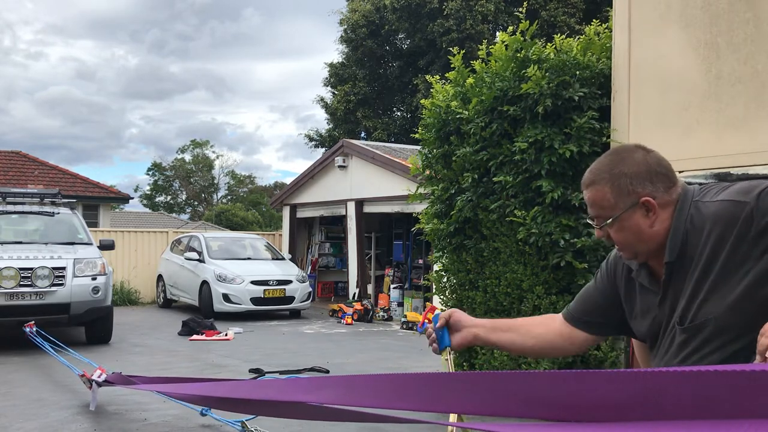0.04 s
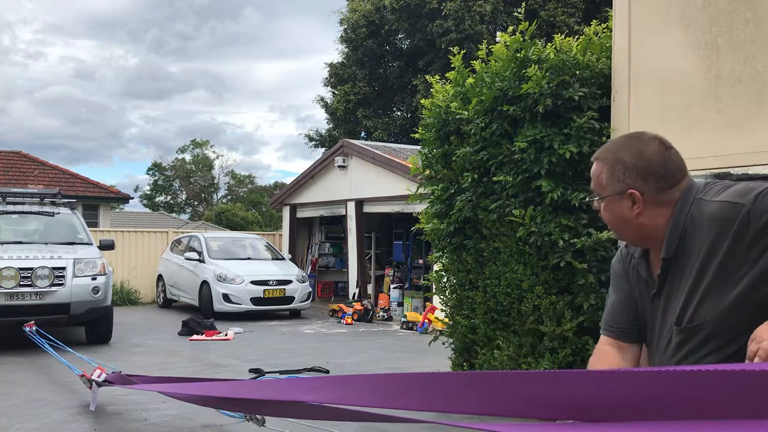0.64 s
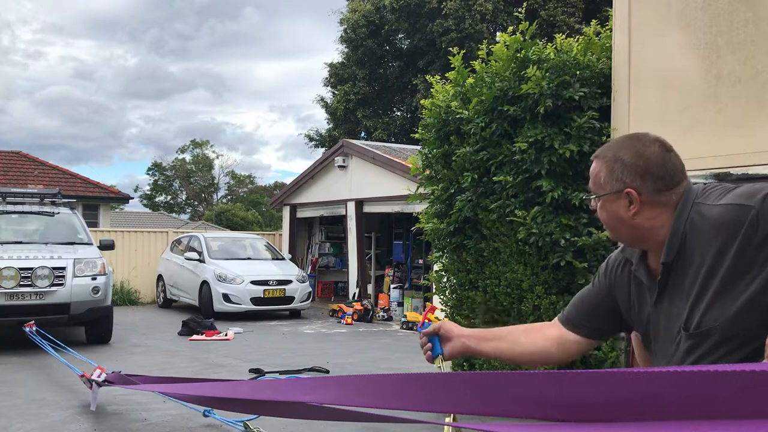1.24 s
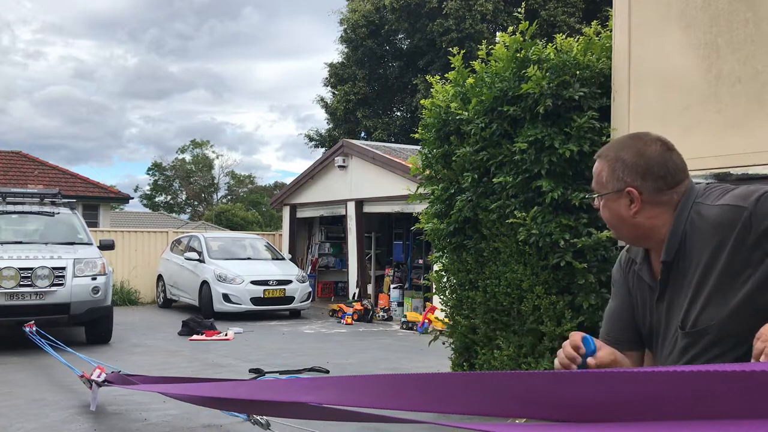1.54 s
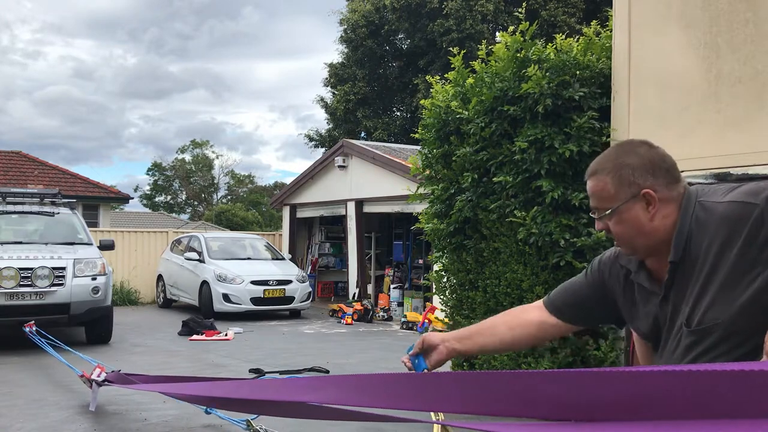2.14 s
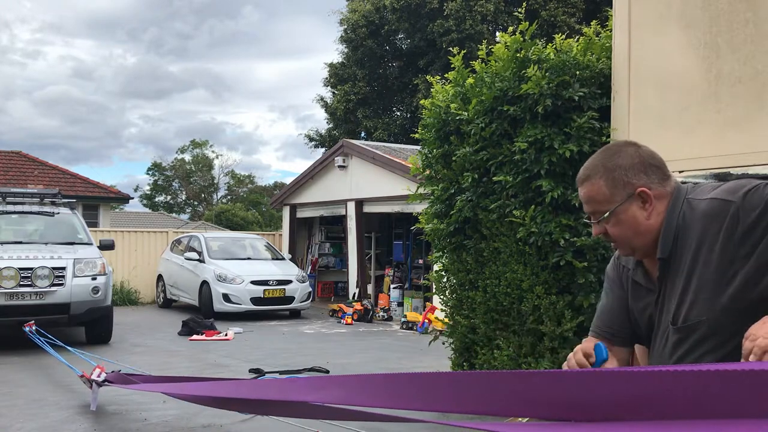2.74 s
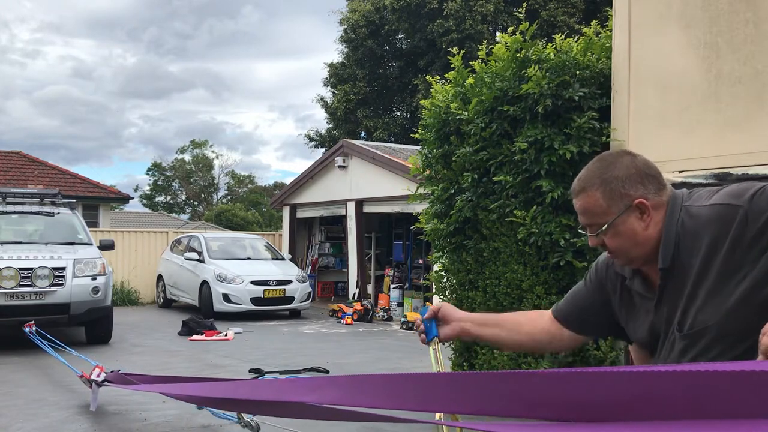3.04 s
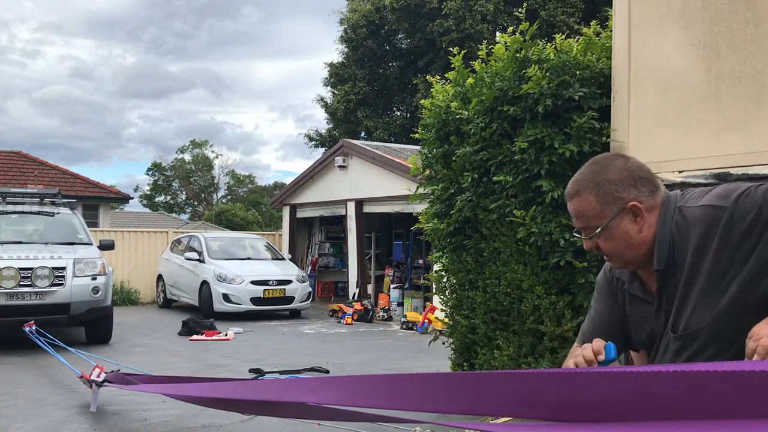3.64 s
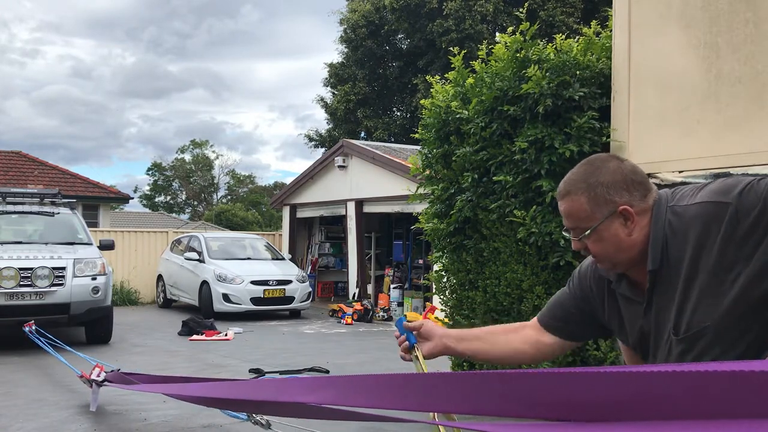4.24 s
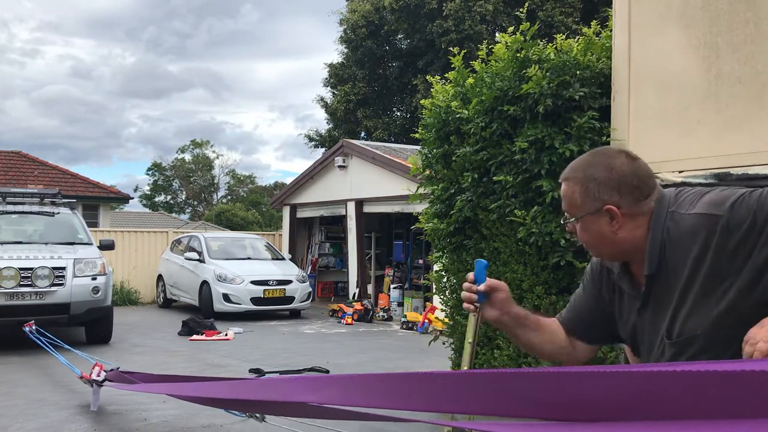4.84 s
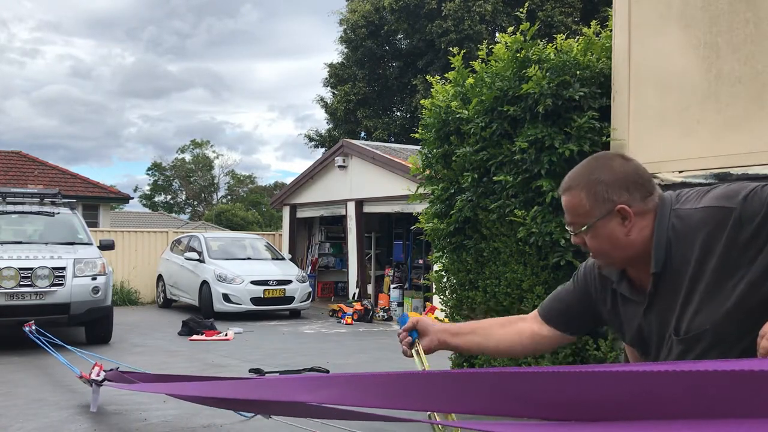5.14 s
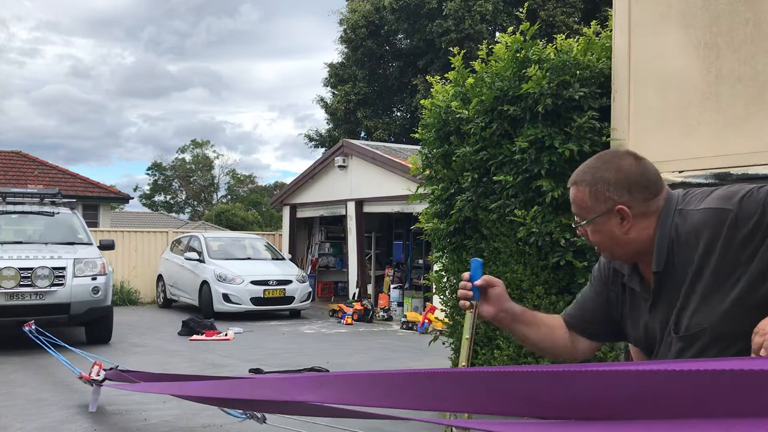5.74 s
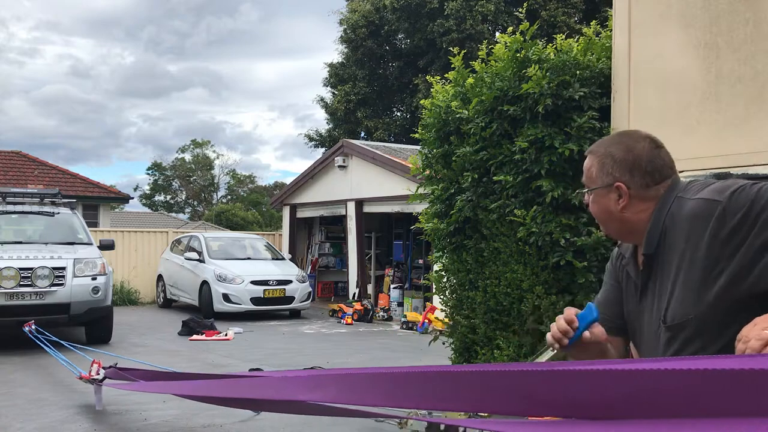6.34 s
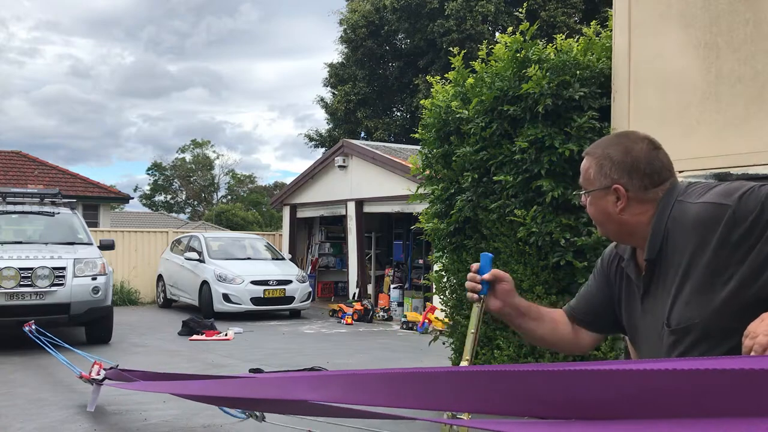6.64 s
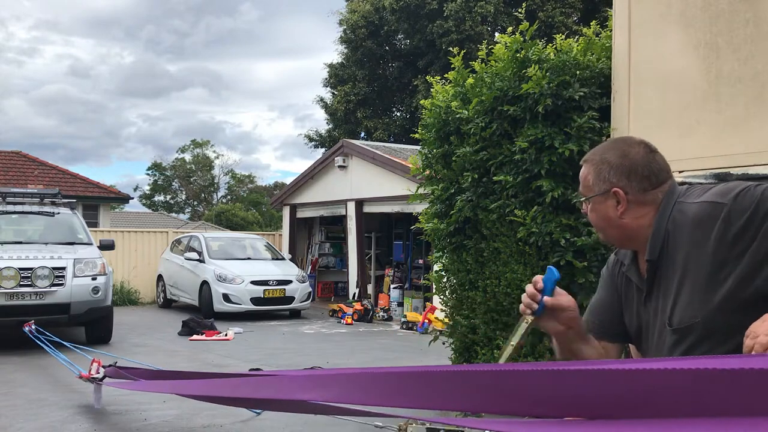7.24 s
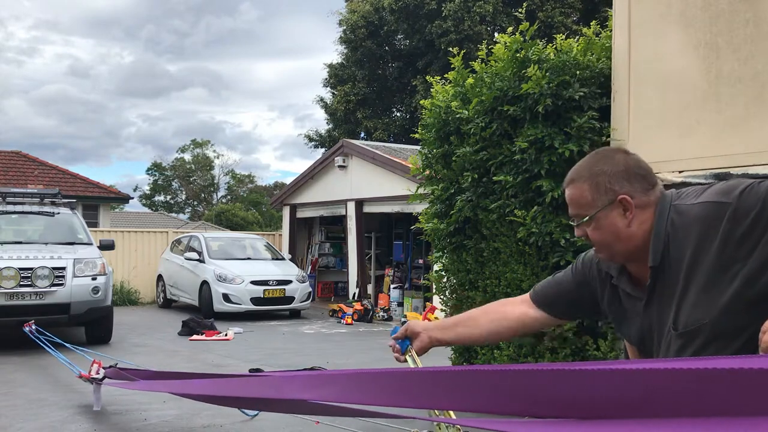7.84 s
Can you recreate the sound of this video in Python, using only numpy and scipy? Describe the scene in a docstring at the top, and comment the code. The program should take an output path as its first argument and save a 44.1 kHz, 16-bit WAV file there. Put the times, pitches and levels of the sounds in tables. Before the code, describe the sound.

A hand winch is pumped nearby in a paved yard, repeating about once a second for eight seconds. Each pull makes a run of three or four soft, rattling metal clicks, followed by a dull clunk as the load settles. The lever's return gives two or three louder, sharper clicks, then a small tick as the ratchet catches again. These sharp groups come at about 0.5, 1.5, 2.5, 3.5, 4.5, 5.4, 6.3 and 7.2 seconds. At roughly 0.9, 1.9 and 3 seconds the tightening strap gives a short, falling twang together with a bright chink of hooks, the first two strongest. After that the ratcheting continues evenly, with a last clunk near 8 seconds. Every click rings briefly in the steel and gets a slight echo from the walls. Underneath lies a faint, low rumble of open air and distant traffic, with a far engine swelling slightly around 5 seconds.

```python
"""A hand winch hauls a vehicle on a taut strap in a paved yard, over the rumble of far traffic.
A pull on the long lever runs the soft, rattling drum pawl; the strap twangs and the hooks chink as they
tighten, and the load settles back on the pawl. The return stroke drops the lever pawl sharply over two
or three teeth, and it bites for the next pull. The pumping goes on, with twangs and chinks only on the
early pulls. Every click rings the steel frame, and the walls answer."""
import sys
import numpy as np
from scipy import signal
from scipy.fft import rfft, irfft, next_fast_len
from scipy.io import wavfile
from scipy.ndimage import map_coordinates

SR = 44100
rng = np.random.default_rng(int(sys.argv[2]) if len(sys.argv) > 2 else 0)


def unload_wav(signal):
    """Save mono or channel-first audio to the path in sys.argv[1] as 16-bit WAV at rate SR, clipped to [-1, 1]."""
    wavfile.write(
        sys.argv[1],
        SR,
        np.round(np.clip(np.atleast_2d(signal).T, -1, 1) * 32767).astype(np.int16),
    )


N = 352359

# Tone colour of each kind of contact:
# (frequency [Hz], lever pawl [dB], drum pawl [dB], settling [dB], bite [dB], chink [dB])
COLOURS = [(250, -27, -15, -18, -25, -23), (560, -26, -15.5, -12, -26, -24), (805, -11.5, -12, -1, 2, -32),
           (1290, -6, -6, 2.5, -4, -19), (2140, -5.5, -4.5, 2, 8, 1), (3150, -1, -1.5, -2, -1.5, -9.5),
           (4630, -1.5, -1.5, -3.5, -3, -3.5), (6350, -1.5, -5, -11, -3.5, -12),
           (6760, -4.5, -7.5, -15, -6.5, 2), (9550, -2.5, -11, -18, -9, -5),
           (12800, 4.5, -12, -20.5, -6, -8), (16200, -3.5, -19, -25, -20, -19)]
LEVER_TONE, DRUM_TONE, SETTLE_TONE, BITE_TONE, CHINK_TONE = range(1, 6)  # its columns


def amp(db):
    """Decibels to gain."""
    return 10 ** (np.asarray(db) / 20)


def unit(x):
    """Scale to rms 1."""
    return x / np.sqrt(np.mean(x ** 2) + 1e-20)


def along(points, hz):
    """Read (frequency [Hz], value) points on a log axis."""
    f, v = np.transpose(points)
    return np.interp(np.log(hz + 1), np.log(f + 1), v)


def filtered(x, response):
    """Shape x with a frequency response."""
    n = x.shape[-1]
    m = next_fast_len(n + 2048)
    return irfft(rfft(x, m) * response(np.fft.rfftfreq(m, 1 / SR)), m)[..., :n]


def resonance(hz, centre_hz, width_hz):
    """Response of one damped mode, 1 at its centre."""
    return 1j * hz * width_hz / (centre_hz ** 2 - hz ** 2 + 1j * hz * width_hz)


def wobble(rate):
    """A smooth random curve, rate knots a second."""
    return map_coordinates(rng.standard_normal(int(N * rate / SR) + 4), [np.arange(N) * rate / SR])


def add(track, s, x):
    """Mix x into the track at time s; what falls outside is dropped."""
    start = round(s * SR)
    x = x[max(-start, 0):]
    part = track[max(start, 0):][:len(x)]
    part += x[:len(part)]


def outdoors(air_db=-54, traffic_db=-61):
    """The bed: gently wavering open-air rumble, the low drone of far traffic and one far engine."""
    air_spectrum = [(24, -57), (33, -20), (42, -1.5), (70, -2), (110, -3), (160, -9.5), (260, -9.5),
                    (400, -16.5), (650, -17), (1050, -16), (2000, -23), (5500, -33), (8000, -36.5),
                    (16000, -46.5)]  # open-air rumble: (frequency [Hz], relative density [dB])
    engine_swell = [(0, -66), (4.5, -65.5), (5, -58), (5.6, -59), (6.4, -64), (8, -61)]  # the engine swells and fades: (time [s], level [dB])

    def hum(centre_hz, half_width_hz):
        noise = rng.standard_normal(N)
        return unit(filtered(noise, lambda hz: resonance(hz, centre_hz, 2 * half_width_hz) ** 2))

    air = unit(filtered(rng.standard_normal(N), lambda hz: amp(along(air_spectrum, hz))))
    air *= amp(air_db + 0.17 * wobble(3.15))
    traffic = amp(traffic_db) * hum(centre_hz=69, half_width_hz=14)
    engine_db = np.interp(np.arange(N) / SR, *np.transpose(engine_swell))
    return air + traffic + amp(engine_db) * hum(centre_hz=198, half_width_hz=22)


def tooth_scrape(drops, offset_db, climb_s, grain_db=6.5):
    """Before each drop the pawl scrapes up the back of the tooth, pressed ever harder by its spring."""
    pressure, t = np.zeros(N), np.arange(SR // 7) / SR
    for s, db, *_ in drops:
        add(pressure, s - t[-1], amp(db + offset_db) * np.exp(-t[::-1] / climb_s))
    # Resonances of the scrape: (frequency [Hz], width [Hz], gain [dB])
    body = [(1740, 130, 9.5), (2080, 290, 10.5), (3150, 510, 3), (4800, 1080, -13.5)]
    grit = rng.standard_normal(N) * amp(grain_db * wobble(250))
    scrape = filtered(grit, lambda hz: sum(amp(db) * resonance(hz, f, width) for f, width, db in body))
    return pressure * unit(scrape)


def dense_ring(t, after_db, bounce_db, bounce_s, dull_db_per_octave=0.58, crack_db=0.3, crack_t60=.01):
    """Countless close modes: the low ones build late; the pawl bounces thrice, ever weaker and duller."""
    # Bands of ringing steel: (frequency [Hz], rise [s], burst t60 [s], after-ring t60 [s])
    ring = [(900, 0.0079, 0.068, 0.14), (1800, 0.0061, 0.059, 0.14), (3240, 0.00067, 0.026, 0.13),
            (7000, 0.0006, 0.044, 0.17), (13000, 0.00038, 0.021, 0.13)]
    centres, rise, burst_t60, after_t60 = np.transpose(ring)[:, :, None]
    band_shapes = [list(zip(centres[:, 0], weights)) for weights in np.eye(len(ring))]
    noise = rng.standard_normal(len(t))
    bands = filtered(noise, lambda hz: np.array([along(shape, hz) for shape in band_shapes]))
    attack = (1 - np.exp(-t / rise)) ** 2
    blow = attack * (amp(-60 * t / burst_t60) ** 2 + amp(after_db - 60 * t / after_t60) ** 2)
    band_ratio = centres / centres[2]
    crack = amp(crack_db - 60 * t / crack_t60) ** 2 * np.minimum(band_ratio, 1) ** 3
    power = blow + crack  # only the first touch cracks
    loss_db = bounce_db - dull_db_per_octave * np.log2(band_ratio)
    for k, s in enumerate(np.cumsum(bounce_s * (.5 + rng.random(3))), 1):
        power += amp(k * loss_db) ** 2 * np.pad(blow, ((0, 0), (round(s * SR), 0)))[:, :len(t)]
    return unit(np.sum(bands * np.sqrt(power), axis=0))


def frame_ring(t, at_drum, scatter_db=2.4, detune=.006, unrest=0.00026):
    """Clear modes: strength and pitch shift with the tooth, and loose joints unsettle their phases."""
    # Modes of the steel frame and wheel:
    # (frequency [Hz], t60 [s], level struck at the lever [dB], level struck at the drum [dB])
    frame = [(718, .35, -11, -11.5), (1140, .12, -4, -5), (1394, .07, -7, -14), (1558, .1, -7, -11),
             (1795, .2, -14, -7), (2125, .14, -6, -7), (2297, .13, -14, -8), (2480, .13, -15, -15),
             (2930, .11, -8, -4), (2992, .11, -5, -15), (3280, .12, -8, -9), (3358, .17, -11, -6.5),
             (3580, .08, -15, -7), (4480, .07, -10, -3), (4650, .09, -7, -12), (5215, .15, -7, -6),
             (5860, .08, -7, -4), (6120, .07, -8, -3), (8200, .06, -10, -5), (9805, .08, -6, -4),
             (10890, .08, -10, -16), (11970, .06, -4, -3), (12600, .06, -7, -10), (13960, .08, -3, -8)]
    hz, t60, lever_db, drum_db = np.transpose(frame)[:, :, None]
    strength, pitch, phase = rng.standard_normal((3, len(frame), 1))
    drift = unrest * hz * np.cumsum(rng.standard_normal((len(frame), len(t))), axis=1) / np.sqrt(len(t))
    db = (drum_db if at_drum else lever_db) + scatter_db * strength - 60 * t / t60
    modes = amp(db) * np.sin(2 * np.pi * (hz * (1 + detune * pitch) * t + phase + drift))
    return unit(modes.sum(axis=0) * (1 - np.exp(-t / 0.0004)))


def in_yard(x, wet_db):
    """A sound and its scattered answer from walls and hedge; the mids hang on longest."""
    decay = [(200, 0.17), (1000, 0.376), (4000, 0.4), (8000, 0.36), (15000, 0.25)]  # reverb of the yard: (frequency [Hz], t60 [s])
    hz, t, spectrum = signal.stft(rng.standard_normal(SR // 2), SR, nperseg=256)
    envelope = amp(-60 * t / along(decay, hz)[:, None]) * (1 - np.exp(-t / 0.01))
    tail = signal.istft(spectrum * envelope, SR, nperseg=256)[1]
    echo = amp(wet_db) * tail / np.linalg.norm(tail)
    echo[0] = 1  # the direct sound
    return signal.fftconvolve(x, echo)


def clicks(hits, tone, at_drum, modes_db, note_db, after_db, bounce_db, bounce_s, wet_db,
           note_width_hz=65, ripple_db=2.4, ripple_hz=330):
    """Each hit rings the winch, with its own low knock, mid clank, high tick and favoured notes.
    Hits: (time [s], level [dB], knock [dB], clank [dB], tick [dB], one or two notes [Hz])."""
    track, t = np.zeros(N), np.arange(SR // 5) / SR
    colour = [(row[0], row[tone]) for row in COLOURS]
    transient = round(.025 * SR)  # the span that carries a hit's level
    for s, db, knock_db, clank_db, tick_db, *notes_hz in hits:
        notes = lambda hz: sum(resonance(hz, note, note_width_hz) for note in notes_hz)
        ring = dense_ring(t, after_db, bounce_db, bounce_s)
        ring = filtered(ring, lambda hz: 1 + amp(note_db) * notes(hz))
        ring += amp(modes_db) * frame_ring(t, at_drum)
        eq = [(1150, knock_db), (1400, clank_db), (2200, clank_db), (2900, 0), (6000, 0), (8000, tick_db)]
        spots = rng.standard_normal(256)  # each contact point feeds some groups of modes, misses others
        ripple = lambda hz: ripple_db * map_coordinates(spots, [hz / ripple_hz], mode="mirror")
        click = filtered(ring, lambda hz: amp(along(colour, hz) + along(eq, hz) + ripple(hz)))
        add(track, s, in_yard(amp(db) * click / np.std(click[:transient]), wet_db))
    return track


def drum_pawl(rattle_db=-50):
    """A pull turns the wheel under the drum pawl; the slow first tooth, mostly softer, rattles."""
    # Pulls: (tooth times [s], level [dB], first tooth softer by [dB], clank [dB], wheel note [Hz])
    pulls = [((0.0136, 0.0964), -33.3, .5, 3.5, 2890), ((0.8841, 0.9915, 1.0771), -33.7, 4, 3.5, 2870),
             ((1.8593, 1.9627, 2.0439, 2.1752), -33.6, -2.5, 3, 1795), ((2.9044, 3.0134, 3.0829, 3.1764),
             -34.6, 2.5, 3, 2130), ((3.8614, 3.9538, 4.0254, 4.1028), -32.8, 7.5, 2.5, 6150),
             ((4.809, 4.9025, 4.9751, 5.0489), -33.4, 3.5, 0, 2930), ((5.7239, 5.8174, 5.8864, 5.9579),
             -32.6, 1.5, -1, 2940), ((6.5988, 6.6938, 6.7652, 6.8523), -32.7, 1.2, 2.5, 2300),
             ((7.5268, 7.6313, 7.6979, 7.7745), -33.7, 6, 1.5, 3400)]
    # First to fourth tooth, as the lever speeds up and slows: (level offset [dB], knock [dB], tick [dB])
    pull_teeth = [(0, 4, -1), (0, -.5, -.8), (0, 1.5, -2), (-1.5, 1, -2)]
    drops = []
    for times, pull_db, first_soft_db, clank_db, note_hz in pulls:
        for k, (s, (tooth_db, knock_db, tick_db)) in enumerate(zip(times, pull_teeth)):
            soft_db = first_soft_db if k == 0 else 0  # a softer drop is duller: more knock and clank
            db = pull_db + tooth_db - soft_db
            drops.append((s, db, knock_db + soft_db, clank_db + .6 * soft_db, tick_db, note_hz))
        drops += [(s, rattle_db, 0, 0, 0, note_hz) for s in rng.uniform(times[0], times[1], 2)]
    ratchet = clicks(drops, DRUM_TONE, at_drum=True, modes_db=-4, note_db=8.5, after_db=-16,
                     bounce_db=-3, bounce_s=.0055, wet_db=-22.5)
    return ratchet + tooth_scrape(drops, offset_db=-17.5, climb_s=0.036)


def strap_twangs(start_hz=1300, end_hz=230, glide_s=0.00224, crest_s=0.0067, log_width=0.27,
                 shudder_db=-14, shudder_t60=0.1):
    """A jolt runs along the taut strap: the highs arrive first, so it sweeps down, then shudders away."""
    twangs = [(.136, -39), (.895, -22), (0.901, -26.5), (1.307, -40.5), (1.853, -20.5), (2.202, -39),
              (2.279, -41), (2.966, -27)]  # jolts of the tightening strap: (time [s], level [dB])
    track, t = np.zeros(N), np.arange(1, SR // 4) / SR
    pitch = end_hz + (start_hz - end_hz) * np.exp(-t / glide_s)
    swell = np.exp(-.5 * (np.log(t / crest_s) / log_width) ** 2)
    sweep = swell * np.sin(2 * np.pi * np.cumsum(pitch) / SR)
    # Tone of the shudder: (frequency [Hz], gain [dB])
    body = [(60, 6), (170, -45), (380, -15), (630, 11.5), (2000, -35), (6000, -70)]
    for s, db in twangs:
        shudder = unit(filtered(rng.standard_normal(len(t)), lambda hz: amp(along(body, hz))))
        shudder *= amp(shudder_db - 60 * t / shudder_t60) * (1 - np.exp(-t / crest_s))
        add(track, s, in_yard(amp(db) * (sweep + shudder), wet_db=-15))
    return track


def hook_chinks(knock_db=-3, clank_db=-6, tick_db=-1):
    """Hooks and line chink brightly as they tighten."""
    chinks = [(0.1845, -52, 9350), (0.2064, -51, 4450), (0.8984, -37, 9140), (1.1505, -53.5, 15000),
              (1.2003, -51.5, 13200), (1.8593, -34, 9350), (1.9224, -47, 4500), (2.9739, -38, 9350)]  # hooks pulling tight: (time [s], level [dB], note [Hz])
    hits = [(s, db, knock_db, clank_db, tick_db, note_hz) for s, db, note_hz in chinks]
    return clicks(hits, CHINK_TONE, at_drum=True, modes_db=-1, note_db=16, after_db=-6,
                  bounce_db=-8, bounce_s=.004, wet_db=-15)


def load_settling(knock_db=-4, clank_db=-6.5, tick_db=.3, note_hz=2850):
    """The load shifts and settles back on the drum pawl with a dull clunk."""
    clunks = [(0.326, -55), (0.3945, -33.5), (1.3522, -33), (1.628, -51), (2.2895, -43.5), (3.3321, -38.5),
              (4.3036, -35.3), (5.2129, -35), (6.1066, -35.5), (6.9856, -37.5), (7.0222, -47),
              (7.9564, -34.5)]  # the pawl takes the load: (time [s], level [dB])
    hits = [(s, db, knock_db, clank_db, tick_db, note_hz) for s, db in clunks]
    return clicks(hits, SETTLE_TONE, at_drum=True, modes_db=-9, note_db=4, after_db=-22,
                  bounce_db=-1, bounce_s=.0044, wet_db=-17)


def lever_pawl(drop_db=-23.8, clank_db=1.5, chatter_db=-40.3, fade_db_per_tooth=.4, thin_db_per_tooth=1.5):
    """The spring snaps the lever pawl over the teeth, equally hard on every return stroke."""
    # Return strokes:
    # (tooth times [s], turn time [s], knock [dB], tick [dB], low wheel note [Hz], high wheel note [Hz])
    returns = [((0.4966, 0.5618), 0.6111, 2.5, -2, 2130, 2950), ((1.4533, 1.5219),
               1.5677, 0, -3, 2125, 5420), ((2.4409, 2.5234, 2.6047), 2.6592, 2, -3.2, 2120, 4620),
               ((3.4409, 3.5173, 3.5804), 3.6323, 2, -2, 2280, 6250), ((4.4161, 4.4972, 4.5631),
               4.6066, 1.5, -2.5, 1135, 3290), ((5.3194, 5.3992, 5.4724), 5.5172, -1.5, -3.8, 1555, 3050),
               ((6.2185, 6.2893, 6.3487), 6.3913, -5, -5.3, 1480, 5200), ((7.0949, 7.1777, 7.2566),
               7.3046, -5, -6, 1500, 4650)]
    drops = []
    for times, turn_s, knock_db, tick_db, *notes_hz in returns:
        for k, s in enumerate(times):
            db = drop_db - k * fade_db_per_tooth
            drops.append((s, db, knock_db + (1 - k) * thin_db_per_tooth, clank_db, tick_db, *notes_hz))
        drops.append((turn_s, chatter_db, knock_db, clank_db, tick_db, *notes_hz))  # the lever turns round
    ratchet = clicks(drops, LEVER_TONE, at_drum=False, modes_db=-7, note_db=8, after_db=-16,
                     bounce_db=-6, bounce_s=.0015, wet_db=-24)
    return amp(-1) * ratchet + tooth_scrape(drops, offset_db=-22, climb_s=0.0076)


def lever_bite(knock_db=-7.5, clank_db=-6.5, tick_db=-4, note_hz=5900):
    """The lever pawl takes up a tooth before the next pull."""
    bites = [(0.7402, -54), (0.818, -39.5), (1.6991, -56), (1.7839, -40.5), (2.8274, -42.6),
             (3.7948, -42.5), (4.7541, -39.5), (5.6677, -40.5), (6.5368, -37.3), (7.4558, -46)]  # the pawl meets the tooth: (time [s], level [dB])
    hits = [(s, db, knock_db, clank_db, tick_db, note_hz) for s, db in bites]
    return clicks(hits, BITE_TONE, at_drum=False, modes_db=-5, note_db=4, after_db=-17,
                  bounce_db=-6, bounce_s=.0025, wet_db=-19)


def scene():
    """The winch and its strap over the open-air bed, in mono."""
    pulling = drum_pawl() + strap_twangs() + hook_chinks()
    return (outdoors() + pulling + load_settling() + lever_pawl() + lever_bite())[None]


def record(dry):
    """A steep low-pass trims the very top of the treble."""
    top_hz = 15850
    return filtered(dry, lambda hz: 1 / np.sqrt(1 + (hz / top_hz) ** 140))


dry = scene()
out = record(dry)
unload_wav(out)
```